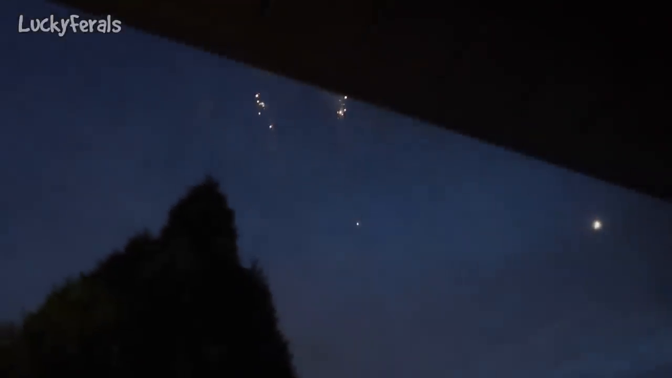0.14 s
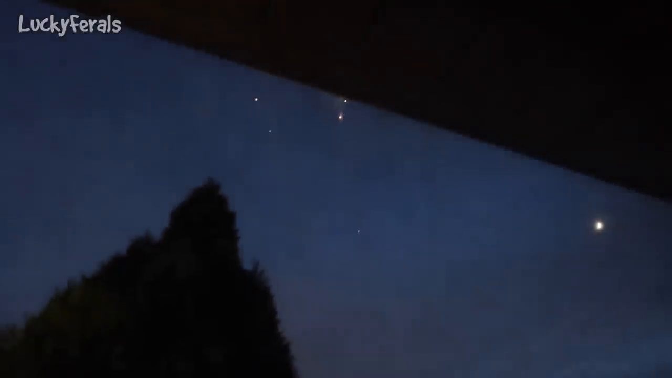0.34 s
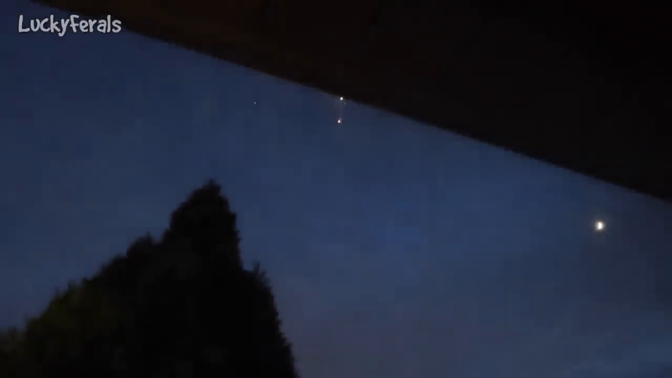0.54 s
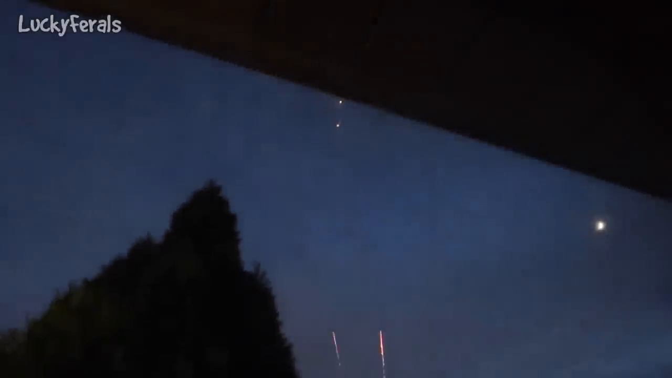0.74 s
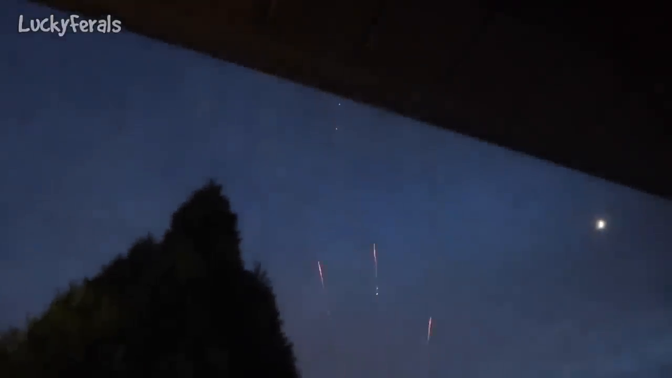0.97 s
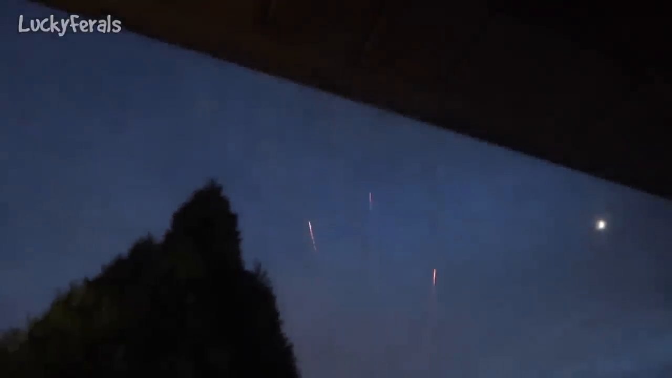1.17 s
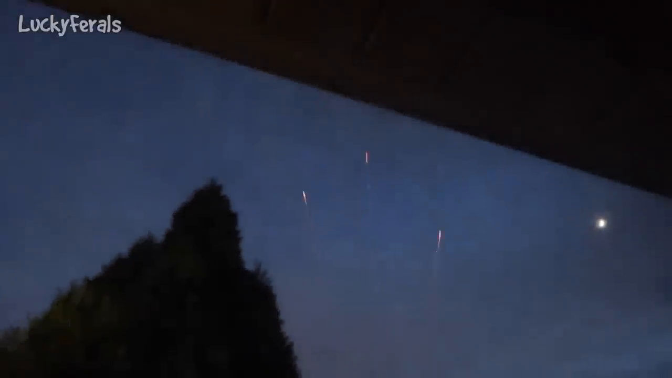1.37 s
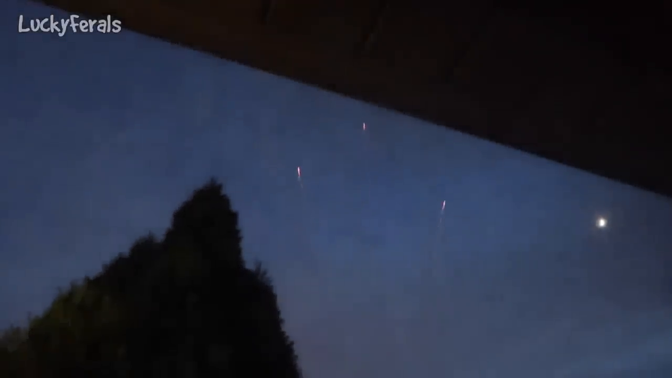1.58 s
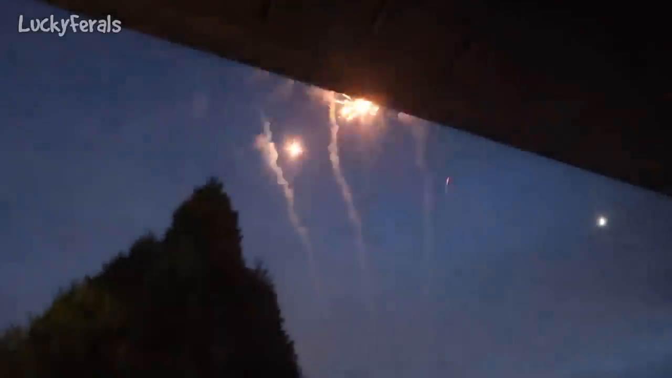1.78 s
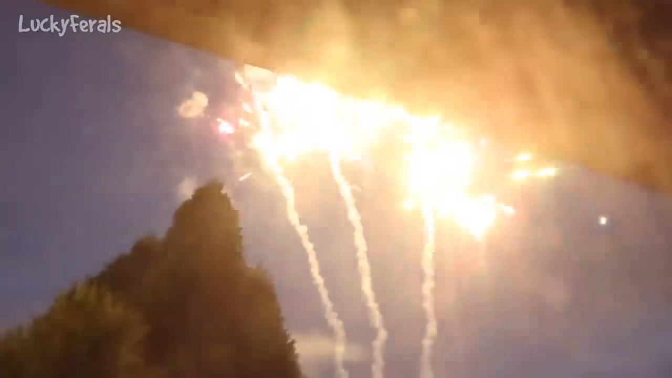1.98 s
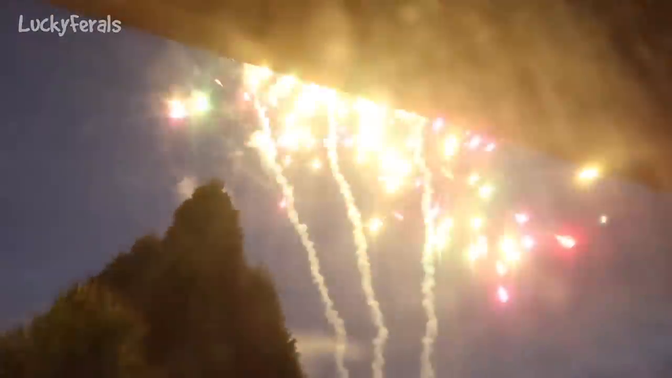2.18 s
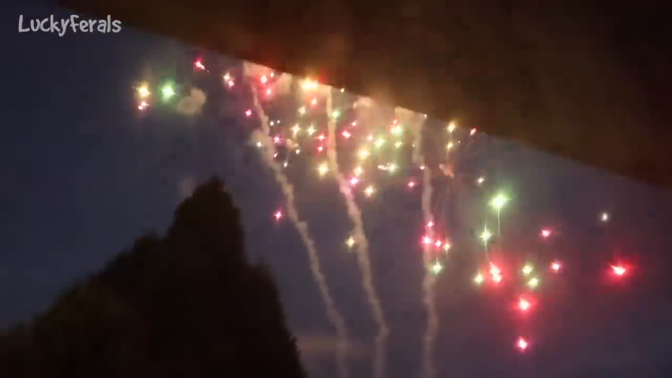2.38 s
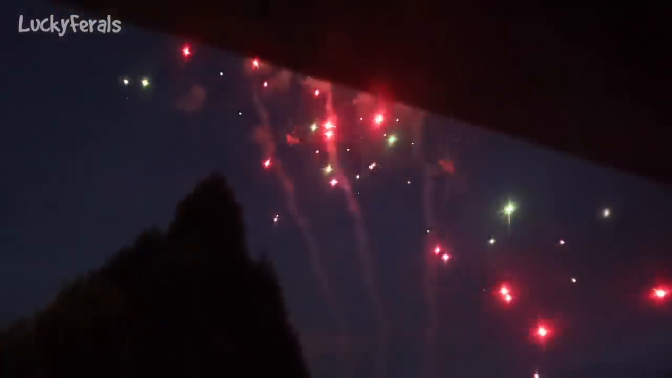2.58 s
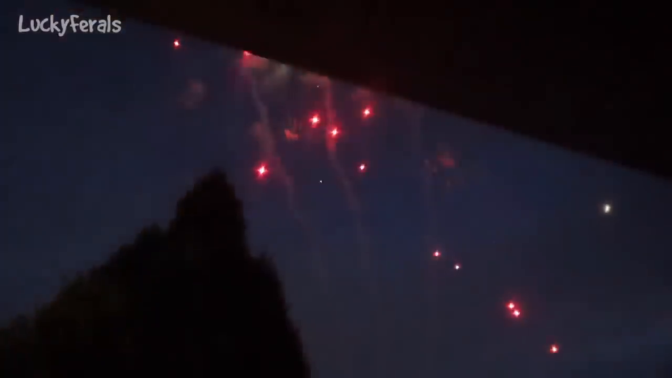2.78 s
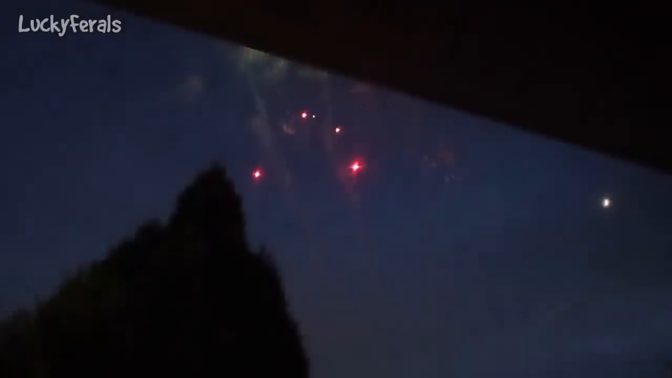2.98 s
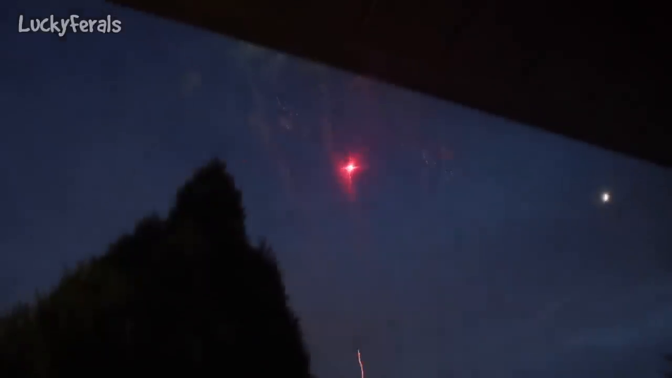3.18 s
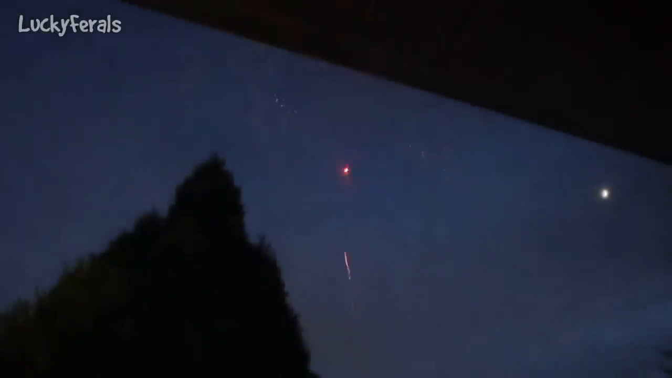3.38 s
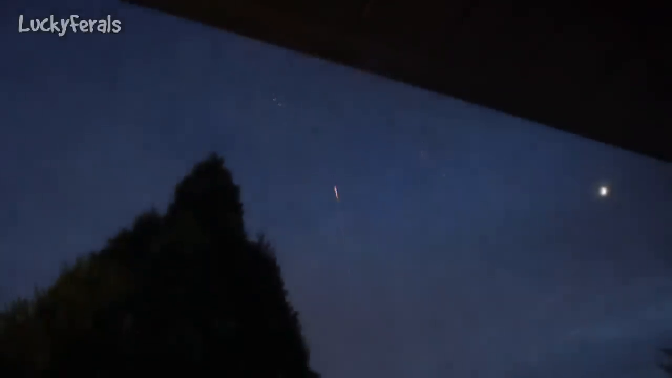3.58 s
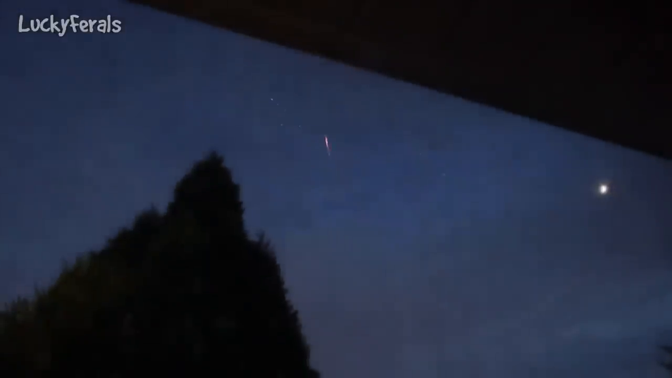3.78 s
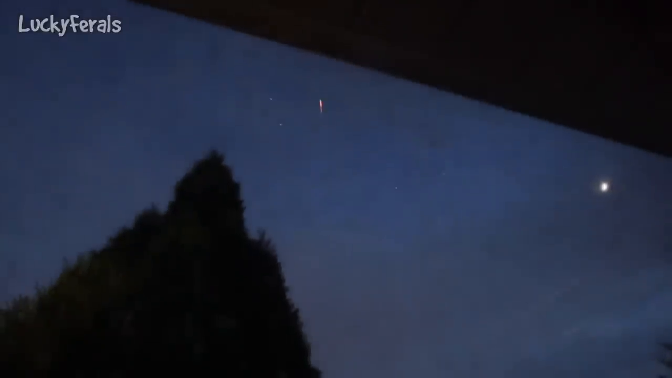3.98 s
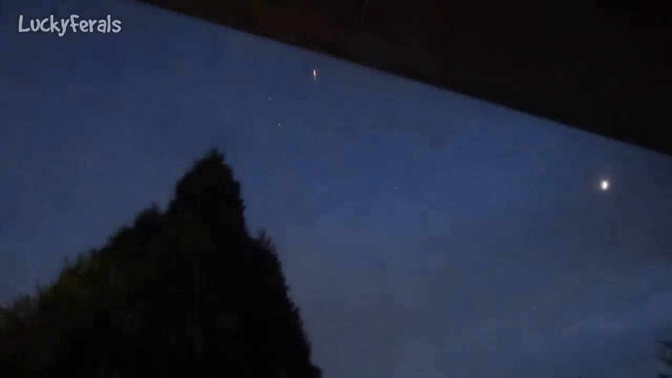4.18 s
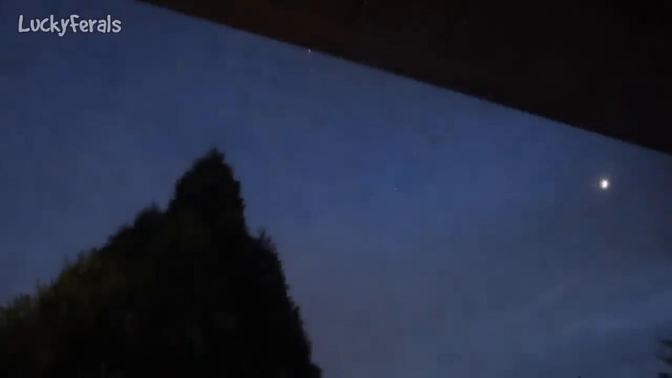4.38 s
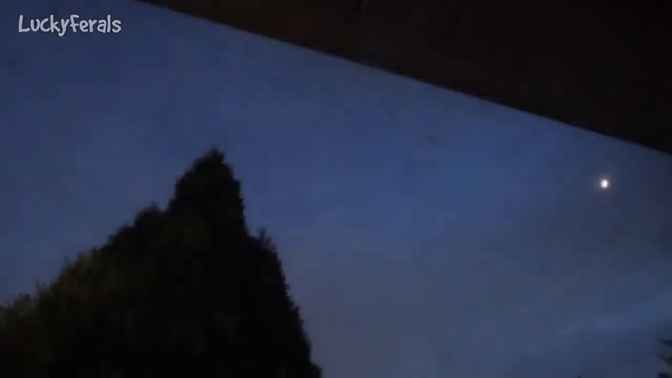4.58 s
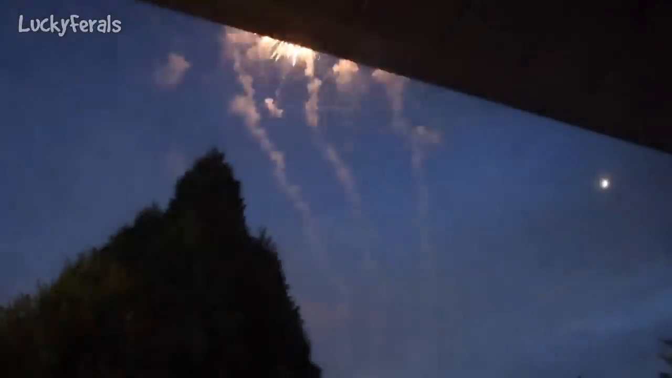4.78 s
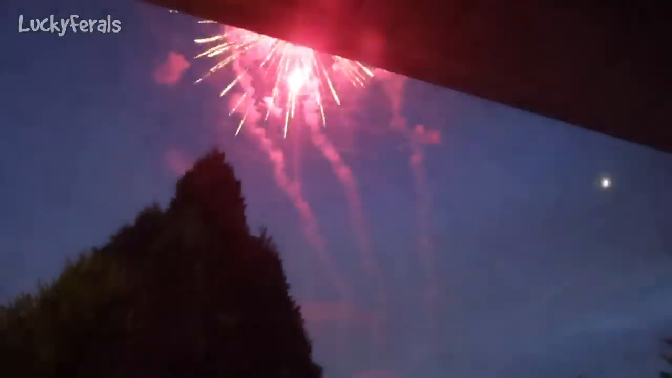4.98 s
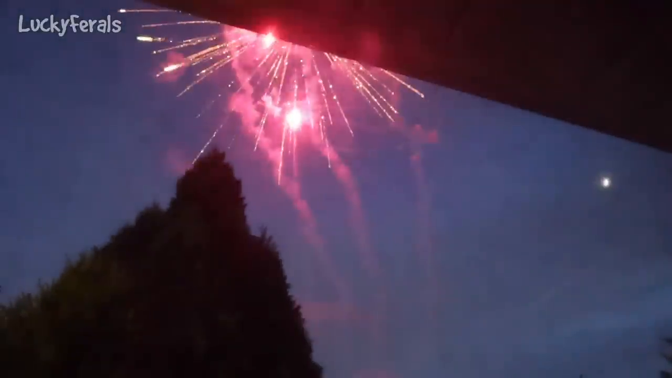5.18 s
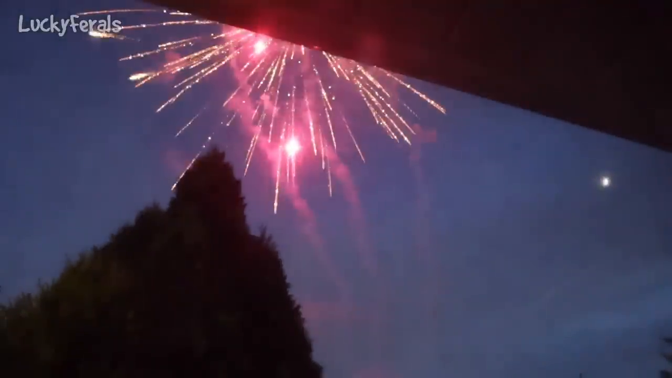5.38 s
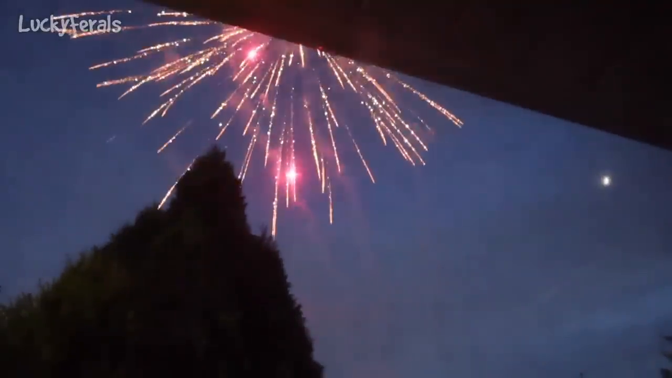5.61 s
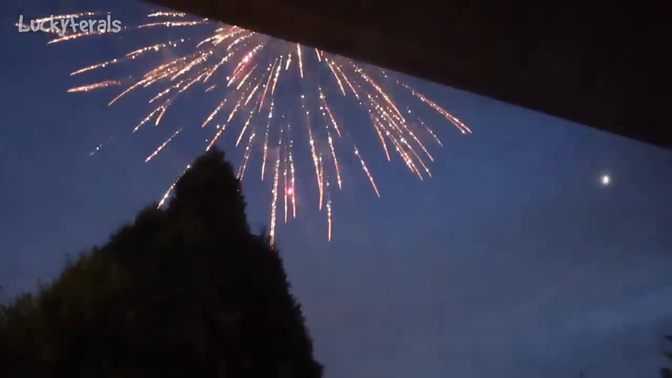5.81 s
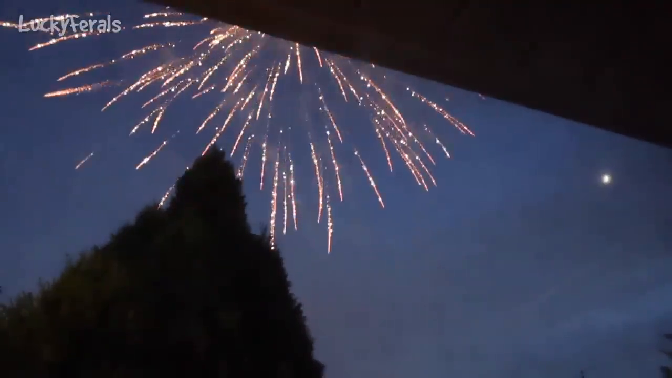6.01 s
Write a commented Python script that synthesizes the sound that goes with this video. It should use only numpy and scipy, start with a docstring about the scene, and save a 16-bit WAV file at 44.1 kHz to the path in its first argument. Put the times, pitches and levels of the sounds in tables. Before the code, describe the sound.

A quiet dusk hush with faint, rapid insect ticking is broken by a soft mortar thump. Over a second later two shells burst almost as one, a huge cracking double bang that overloads the microphone, slaps off the porch walls and rolls away. A second, deeper thump follows, then a long wait and one more heavy bang with a rumbling tail.

```python
"""Fireworks at dusk, heard from under a porch roof: two mortar launches thump, three shells burst overhead.
Each burst is a steep shock, then porch scatter, wall slaps, an echo of the houses and a long distant roll.
The mortars are filtered noise with a low boom; their tubes push the air and ring.
An insect ticks faintly on short sine pulses over a hush of town rumble and hiss, both shaped noise;
the background swells faintly at times. Loud sound overloads the microphone and ducks its gain."""
import sys
import numpy as np
from scipy import signal
from scipy.fft import rfft, irfft
from scipy.io import wavfile
from scipy.ndimage import uniform_filter1d

SR = 44100
rng = np.random.default_rng(int(sys.argv[2]) if len(sys.argv) > 2 else 0)


def unload_audio(sound):
    """Save the sound as a 16-bit wav file, at the path given as the first command line argument."""
    columns = np.transpose(np.atleast_2d(sound))
    # keep every value between -1 and 1, then stretch to whole-number steps
    steps = np.round(np.clip(columns, -1, 1) * 32767)
    wavfile.write(sys.argv[1], SR, steps.astype(np.int16))


N = 266805  # samples
SIZE = 8192  # samples in a filter
HZ = np.fft.rfftfreq(SIZE, 1 / SR)


def amp(db):
    """Decibels to gain."""
    return 10 ** (np.asarray(db) / 20)


def read(points, hz):
    """A table joined by straight lines on a log-frequency axis."""
    table_hz, value = np.transpose(points)
    return np.interp(np.log(hz + 1), np.log(table_hz + 1), value)


def add(mix, start_s, sound):
    """Lays a sound into the mix at start_s, cut off at the end of the mix."""
    part = mix[:, round(start_s * SR):][:, :sound.shape[-1]]
    part += sound[..., :part.shape[1]]


def colour(sound, gain_db):
    """Minimum-phase filter, so nothing sounds early; gain_db is its gain on the grid HZ."""
    cepstrum = irfft(np.log(amp(gain_db)))
    # fold the second half of the cepstrum onto the first
    cepstrum[1:SIZE // 2] *= 2
    cepstrum[SIZE // 2 + 1:] = 0
    taps = irfft(np.exp(rfft(cepstrum)))
    return signal.fftconvolve(sound, taps[None], axes=1)[:, :sound.shape[1]]


def shape(points, size=1):
    """A spectrum of unit power; a larger charge shifts it down."""
    level_db = read(points, HZ * size)
    return level_db - 10 * np.log10(np.mean(amp(level_db) ** 2))


def noise_pair(likeness, count):
    """White noise at two microphone ports, as alike in each band as the table says."""
    shared, apart = rfft(rng.standard_normal((2, count)))
    same = read(likeness, np.fft.rfftfreq(count, 1 / SR))
    mid = shared * np.sqrt((1 + same) / 2)
    side = apart * np.sqrt((1 - same) / 2)
    return irfft(np.array([mid + side, mid - side]), count)


# evening hush at the porch, spectrum before the porch: [pitch_hz, level_db]
HUSH_SPECTRUM = [(20, -23), (40, 1), (75, -9), (120, -0.5), (170, -14.5), (350, -10), (550, -18.5),
                 (1000, -18), (2000, -21.5), (4200, -27), (7000, -30), (11000, -33), (15000, -37.5)]
# how alike the hush is at the left and right ports: [pitch_hz, likeness (1 is identical)]
HUSH_PORTS = [(60, 1), (130, 0.95), (290, 0.48), (640, 0.037), (1410, 0.074), (3100, 0.26), (6820, 0.42),
              (15000, 0.29)]
HUSH_DB = -44  # before the porch


def hush():
    """Distant town rumble and microphone hiss: steady noise with one fixed spectrum."""
    return amp(HUSH_DB) * colour(noise_pair(HUSH_PORTS, count=N), shape(HUSH_SPECTRUM))


# ticks at a loose, steady pace; gaps vary evenly by up to this fraction
TICK_GAP_S, TICK_GAP_SPREAD = 0.064, .3
# level and pitch spreads are rms
TICK_DB, TICK_SPREAD_DB = -54, 3.5
TICK_HZ, TICK_SPREAD_HZ, TICK_WIDTH_S = 4370, 67, 0.0026


def insect():
    """A train of short soft-edged sine ticks near one high pitch, each a little different."""
    out = np.zeros((2, N))
    t = np.arange(SR // 50) / SR
    draws = rng.uniform(-1, 1, (N // 1000, 3))
    times = np.cumsum(TICK_GAP_S * (1 + TICK_GAP_SPREAD * draws[:, 0]))
    window = np.exp(-(t / TICK_WIDTH_S - 2) ** 2)
    # the root of 3 brings even draws to unit rms
    for start_s, (_, loud, high) in zip(times, draws * np.sqrt(3)):
        tone = np.sin(2 * np.pi * (TICK_HZ + TICK_SPREAD_HZ * high) * t)
        add(out, start_s, amp(TICK_DB + TICK_SPREAD_DB * loud) * window * tone)
    return out


def shock(ms, front_hz, damping):
    """A steep front that swings to suction and rebound, first crossing zero near ms; air rounds its edge."""
    u = np.arange(SIZE) / SR * 1000 / ms
    wave = -np.cos(np.pi * u / 2) * np.exp(-damping * u)
    return signal.lfilter(*signal.butter(2, front_hz, fs=SR), wave)


def slap(ms):
    """A blast that arrives with its front blunted."""
    return shock(ms, front_hz=1440, damping=0.41)


# how alike blast and swell noise is at the left and right ports: [pitch_hz, likeness (1 is identical)]
BLAST_PORTS = [(100, 1), (300, .996), (600, .98), (1300, .82), (3000, .5), (8000, .4)]


def ring(hz, width_hz, t60):
    """A rough ring: noise in one narrow band, dying 60 dB in t60 seconds."""
    t = np.arange(SR // 2) / SR
    edges_hz = [hz - width_hz / 2, hz + width_hz / 2]
    band = signal.butter(2, edges_hz, "band", fs=SR, output="sos")
    sound = signal.sosfilt(band, noise_pair(BLAST_PORTS, count=len(t)))
    return sound / sound.std() * amp(-60 * t / t60)


# reports of the mortar tubes, direct or thrown back:
# [start_s, push_db, push_ms, ring_db, tube_hz, overtone_step_db]
TUBE_REPORTS = [(0.4943, -18, 1.4, -33.5, 2170, -12.5), (0.541, -17, 1, -32, 2190, -18),
                (0.573, -17, 2.5, -38, 2230, -20), (3.108, -10, 4.1, -32, 1380, -0.5),
                (3.176, -11, 1.2, -24.5, 1340, -17), (3.267, -28, 1.5, -44, 1320, -20)]


def tubes():
    """Each report is a blunt push of air and a brief ring on the first three harmonics of its tube."""
    out = np.zeros((2, N))
    for start_s, push_db, push_ms, ring_db, tube_hz, step_db in TUBE_REPORTS:
        add(out, start_s, amp(push_db) * slap(push_ms))
        for k in range(3):
            overtone = ring((k + 1) * tube_hz, width_hz=320, t60=0.17)
            add(out, start_s, amp(ring_db + k * step_db) * overtone)
    return out


def scatter(hold, t60, treble_t60, treble_db):
    """First reflections off roof and walls: the bass holds before it dies, the treble fades from the start."""
    t = np.arange(SR // 2) / SR
    dense = noise_pair(BLAST_PORTS, count=len(t))
    bass = signal.sosfilt(signal.butter(2, 900, fs=SR, output="sos"), dense)
    treble = signal.sosfilt(signal.butter(2, 900, "high", fs=SR, output="sos"), dense)
    bass_fade = amp(-60 * np.maximum(t - hold, 0) / t60)
    treble_fade = amp(treble_db - 60 * t / treble_t60)
    # opposite signs let the two bands join smoothly
    return bass * bass_fade - treble * treble_fade


def echoes(t60, rise, count, lumps_db):
    """Countless reflections that build up over the rise time, then die band by band, in lumps."""
    hz, t, bands = signal.stft(noise_pair(BLAST_PORTS, count=count), SR, nperseg=256)
    lumps = uniform_filter1d(rng.standard_normal(len(t)), size=6)
    decay_db = 60 * np.maximum(t - rise, 0) / read(t60, hz)[:, None]
    fade = amp(lumps_db * lumps / lumps.std() - decay_db)
    tail = signal.istft(bands * fade, SR, nperseg=256)[1][:, :count]
    return tail * np.sqrt(np.minimum(np.arange(count) / SR / rise, 1))


# mortar launches behind the trees: [start_s, first_arrival_db, house_echo_db, echo_delay_s,
# size (larger is deeper), lowest_hz, boom_db, boom_hz, echo_length (multiplies the fading times)]
MORTAR_LAUNCHES = [(.495, -20, -15.5, .034, .98, 95, -28, 194, 1.14),
                   (3.103, -16.5, -14, 0.036, 0.97, 24.04, -16, 173, 0.97)]
# colour of a launch of size 1: [pitch_hz, level_db]
MORTAR_COLOUR = [(20, -49.5), (45, 3.5), (100, 4.5), (195, -1), (250, -1.5), (330, -0.5), (480, -15),
                 (900, -22), (1500, -20), (2700, -30), (5000, -37), (8000, -49), (16000, -72.5)]
# fading of its house echo at echo_length 1: [pitch_hz, t60_s]
MORTAR_FADING = [(60, 1.38), (140, 0.62), (320, 0.74), (700, 1.03), (1500, 0.71), (6000, 0.54)]


def launches():
    """Mortars behind the trees: a thump with a low boom, then a wash from the house fronts."""
    out = np.zeros((2, N))
    for start_s, first_db, houses_db, delay_s, size, low_hz, boom_db, boom_hz, length in MORTAR_LAUNCHES:
        fading = [(hz, t60 * length) for hz, t60 in MORTAR_FADING]
        low_cut_db = 10 * np.log10(1 + (low_hz / (HZ + 10)) ** 4)
        body = shape(MORTAR_COLOUR, size) - low_cut_db
        thump = colour(scatter(hold=0.054, t60=0.16, treble_t60=0.88, treble_db=-1.5), body)
        add(out, start_s, amp(first_db) * thump)
        add(out, start_s, amp(boom_db) * ring(boom_hz, width_hz=110, t60=0.46))
        wash = colour(echoes(fading, rise=0.046, count=2 * SR, lumps_db=1.2), body)
        add(out, start_s + delay_s, amp(houses_db) * wash)
    return out


# faint brief swells of the background noise: [start_s, level_db, pitch_hz, t60_s]
NOISE_SWELLS = [(1.634, -39.5, 125, 0.43), (4.343, -37, 388, 0.26), (4.542, -37, 123, 0.21)]


def swells():
    """Faint brief swells of the background noise, each mostly in one band and dying away."""
    out = np.zeros((2, N))
    t = np.arange(SR // 2) / SR
    for start_s, level_db, hz, t60 in NOISE_SWELLS:
        swell = noise_pair(BLAST_PORTS, count=len(t)) * amp(level_db - 60 * t / t60)
        band = shape([(hz / 2, -20), (hz, 0), (hz * 2, -25), (hz * 10, -60)])
        add(out, start_s, colour(swell, band))
    return out


def snap(front_hz, level_db):
    """The very edge of a front: a thin spike that drives the two ports in opposite ways."""
    spike = signal.lfilter(*signal.butter(2, front_hz, fs=SR), signal.unit_impulse(SIZE))
    return amp(level_db) * spike / spike.max() * np.array([[1], [-.6]])


# shells overhead: [start_s, shock_db, shock_ms, front_hz (sharpness), porch_scatter_db, house_echo_db,
# distant_roll_db, size (larger is deeper), wall_slap_delay_s, wall_slap_db]
SHELL_BURSTS = [(1.967, 6.5, 1.06, 7000, -5, -16, -31.5, 0.89, .0132, -8.5),
                (2.0497, 11, 0.91, 5000, -3, -9, -35, 1.02, .0048, 9.5),
                (5.0017, 11.5, 1.25, 7660, -3.5, -6, -27.5, 1.36, .0182, 2.5)]
# colours at size 1 of porch scatter, house echo and distant roll: [pitch_hz, level_db]
PORCH_COLOUR = [(20, -11.5), (60, -8.5), (130, 6), (230, 3.5), (380, 1.5), (520, -3), (750, -19.5),
                (1300, -29.5), (3000, -43), (5500, -47), (8000, -54), (16000, -78)]
HOUSE_COLOUR = [(20, -29.5), (60, -0.5), (130, -3), (260, 3), (380, 5), (520, -5), (800, -19),
                (1400, -24.5), (3000, -32.5), (5000, -41.5), (8000, -47.5), (16000, -109)]
ROLL_COLOUR = [(20, 1.5), (50, -6.5), (130, 0.5), (330, 1), (420, 2), (550, -5), (850, -19), (1500, -23.5),
               (3000, -37), (5000, -52.5), (8000, -88), (16000, -71)]
# fading of house echo and distant roll: [pitch_hz, t60_s]
HOUSE_FADING = [(60, 0.85), (300, 0.46), (1500, 1), (6000, 0.9)]
ROLL_FADING = [(60, 7.5), (350, 3.5), (700, 2.26), (3000, 4.5), (7000, 0.85)]
# walls return the shock blunter: the first longer, the second later and shorter
SLAP_STRETCH = 1.18
REBOUND_S, REBOUND_DB, REBOUND_STRETCH = .025, -6, 0.87


def bursts():
    """Each shell: shock, scatter in the porch, slaps from two walls, echo of the houses, long roll."""
    out = np.zeros((2, N))
    for (start_s, shock_db, ms, front_hz, near_db, houses_db, roll_db,
         size, wall_s, wall_db) in SHELL_BURSTS:
        add(out, start_s, snap(front_hz, level_db=-3))
        add(out, start_s + 4 / SR, amp(shock_db) * shock(ms, front_hz, damping=0.27))

        near = scatter(hold=0.026, t60=0.16, treble_t60=0.21, treble_db=16.0)
        add(out, start_s + .003, amp(near_db) * colour(near, shape(PORCH_COLOUR, size)))

        slap_s = start_s + wall_s
        add(out, slap_s, amp(wall_db) * slap(ms * SLAP_STRETCH))
        add(out, slap_s + REBOUND_S, amp(wall_db + REBOUND_DB) * slap(ms * REBOUND_STRETCH))

        houses = echoes(HOUSE_FADING, rise=0.076, count=SR, lumps_db=-0.5)
        add(out, start_s + .045, amp(houses_db) * colour(houses, shape(HOUSE_COLOUR, size)))
        roll = echoes(ROLL_FADING, rise=0.31, count=3 * SR, lumps_db=2.0)
        add(out, start_s + 0.12, amp(roll_db) * colour(roll, shape(ROLL_COLOUR, size)))
    return out


# standing waves of the porch, before the treble taper: [pitch_hz, width_hz, lift_db]
PORCH_WAVES = [(96.06, 5.5, 10), (127, 9.6, 3), (156.7, 28, 5.5), (206.6, 6.3, 9.5), (227, 9.5, 10.5),
               (307.2, 23.4, 11), (405.2, 20.6, 11), (502, 7.1, 8), (563, 14.5, 9), (648, 39, 5),
               (743, 16, 8), (880, 29, 4.5), (1184, 40, 6.5), (1496, 59, -1), (2570, 20, -1),
               (2920, 1020, 8.5), (4220, 390, 4)]


def porch(sound, valley_db, top_hz):
    """The space under the roof lifts its standing waves, those below top_hz most."""
    lift_db = sum(db / (1 + (2 * (HZ - hz) / width_hz) ** 2) for hz, width_hz, db in PORCH_WAVES)
    return colour(sound, (lift_db + valley_db) / (1 + (HZ / top_hz) ** 2))


# lean of blasts and swells between the microphone ports: [pitch_hz, left_over_right_db]
PORT_BALANCE = [(200, 0), (400, .5), (700, 2), (1300, 3.7), (2400, 3), (4400, 2), (9000, .5)]


def scene():
    """Blasts and swells lean to the left port; the hush is all around and the insect sits in the middle."""
    leaning = porch(bursts() + launches() + tubes() + swells(), valley_db=-1.5, top_hz=9000)
    lean_db = read(PORT_BALANCE, HZ) / 2
    leaning = np.vstack([colour(leaning[:1], lean_db), colour(leaning[1:], -lean_db)])
    return leaning + porch(hush(), valley_db=1, top_hz=696) + insect()


# treble loss of the recorder: [pitch_hz, gain_db]
TREBLE_LOSS = [(5000, 0), (8000, -4), (12000, -8), (16000, -9.5)]
EDGE_HZ = 15400  # band limit


def record(dry, threshold_db=-12, slope=0.51, recovery_db=35):
    """Gain ducks when loud and recovers steadily; peaks clip, treble dulls, the band ends."""
    power = signal.lfilter(*signal.butter(1, 8, fs=SR), (dry ** 2).mean(0))
    level_db = 10 * np.log10(abs(power) + 1e-12)
    # a peak hold that slides down by recovery_db each second
    fall_db = np.arange(N) * recovery_db / SR
    held_db = np.maximum.accumulate(level_db + fall_db) - fall_db
    over_db = np.maximum(held_db - threshold_db, 0)
    driven = dry * amp(-slope * over_db)
    clipped = driven / (1 + driven ** 10) ** (1 / 10)
    dulled = colour(clipped, read(TREBLE_LOSS, HZ))
    band_limit = signal.firwin(255, EDGE_HZ, window=("kaiser", 9), fs=SR)
    return signal.oaconvolve(dulled, band_limit[None], "same")


dry = scene()
out = record(dry)
unload_audio(out)
```